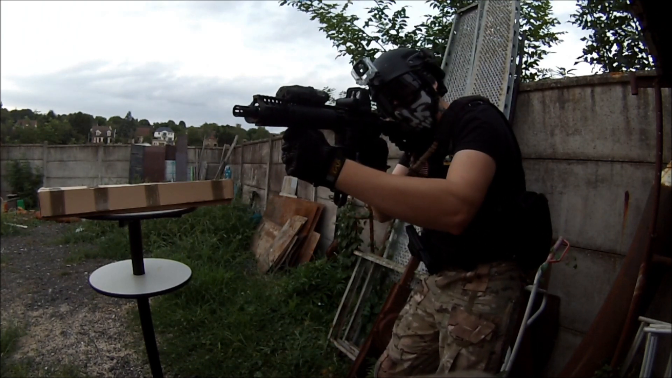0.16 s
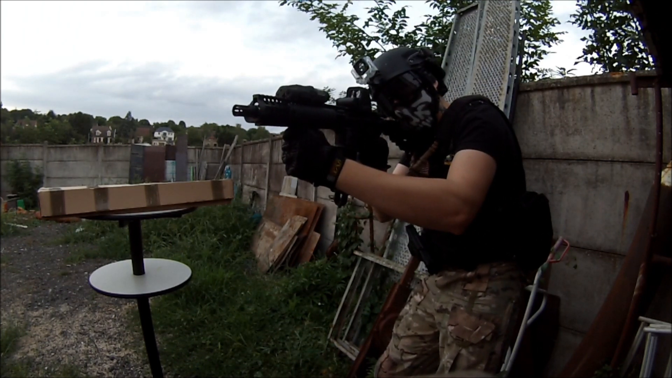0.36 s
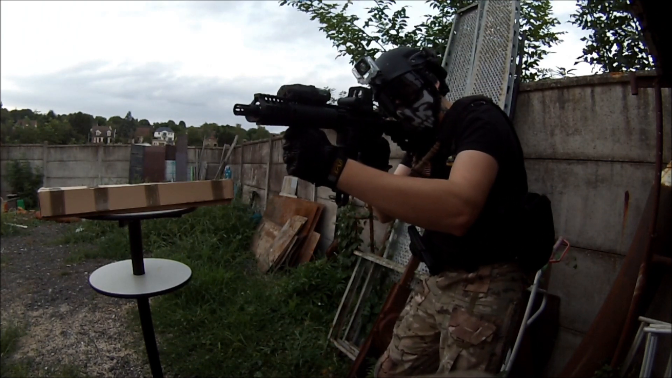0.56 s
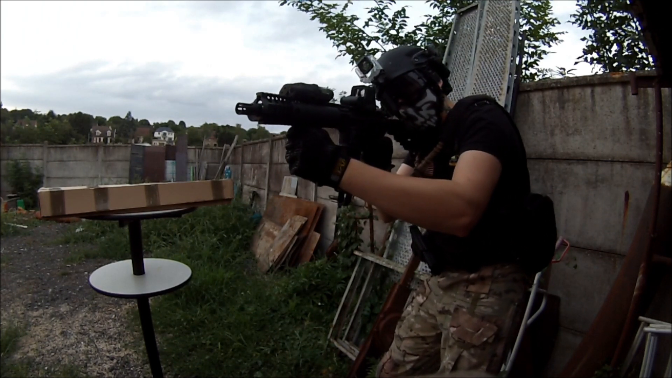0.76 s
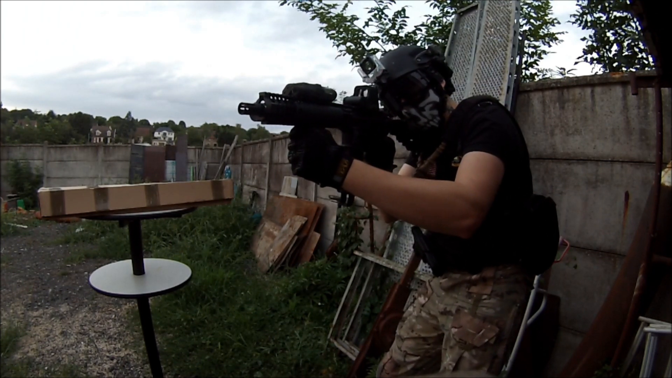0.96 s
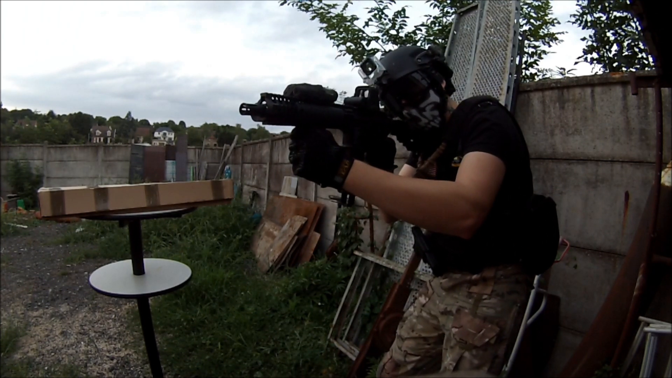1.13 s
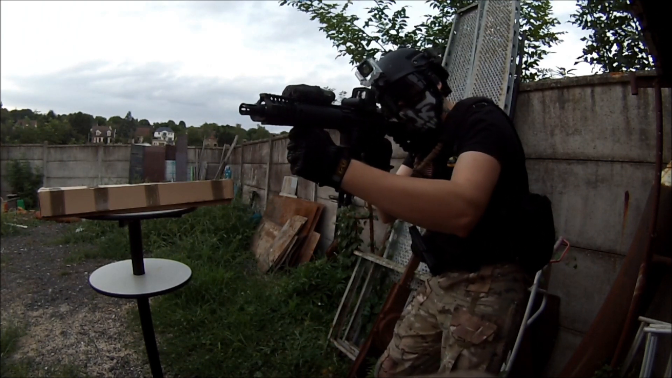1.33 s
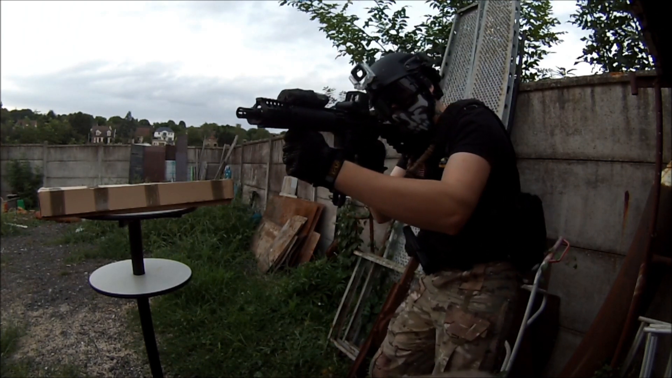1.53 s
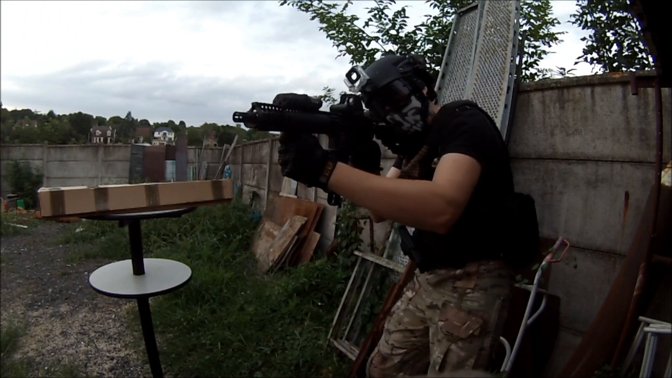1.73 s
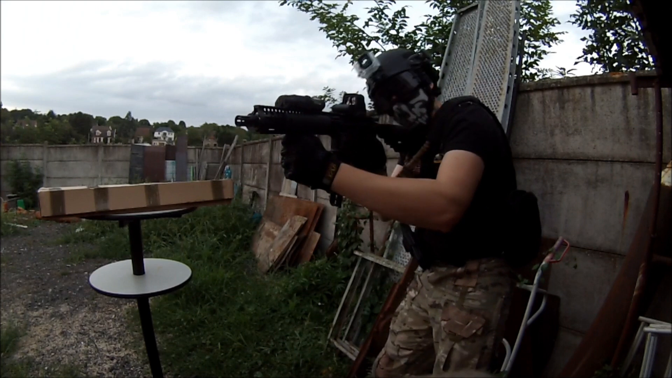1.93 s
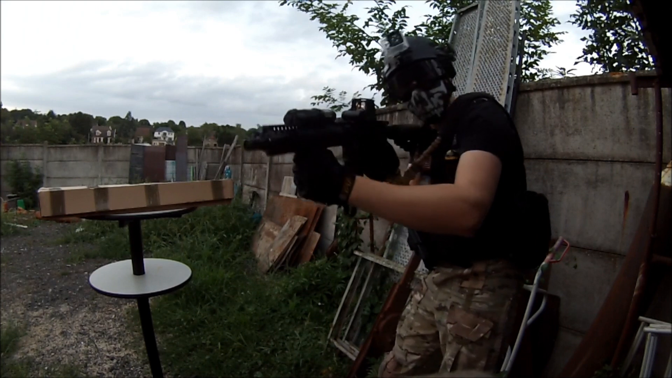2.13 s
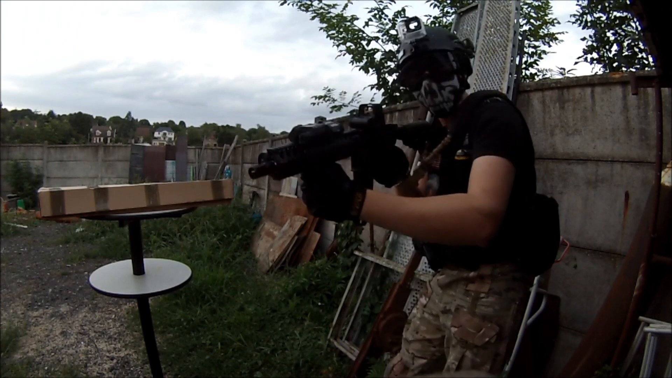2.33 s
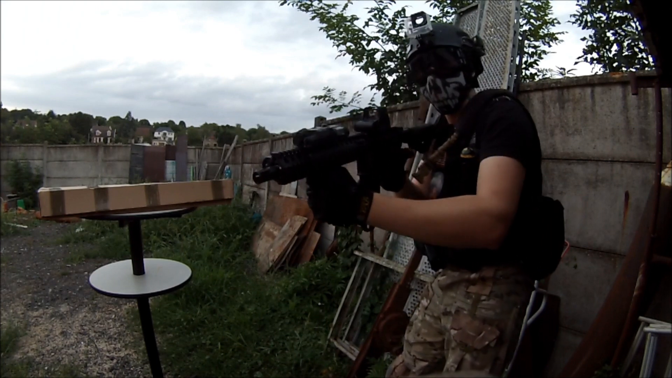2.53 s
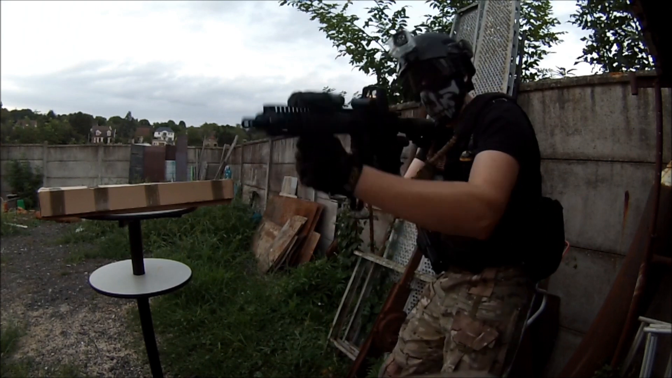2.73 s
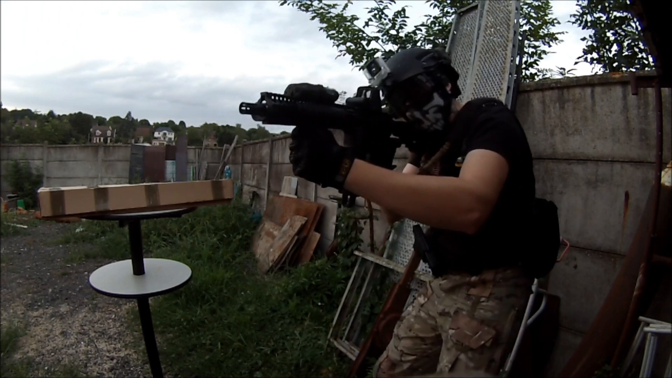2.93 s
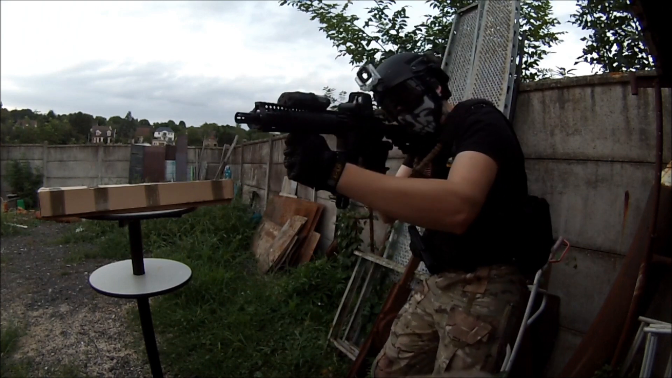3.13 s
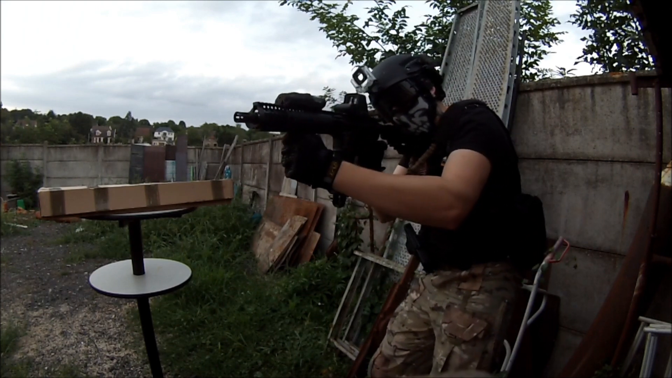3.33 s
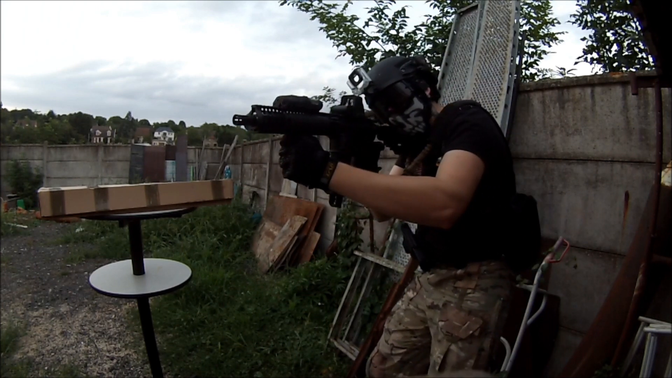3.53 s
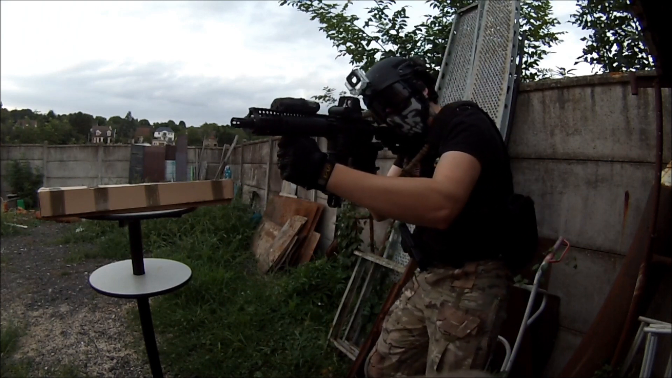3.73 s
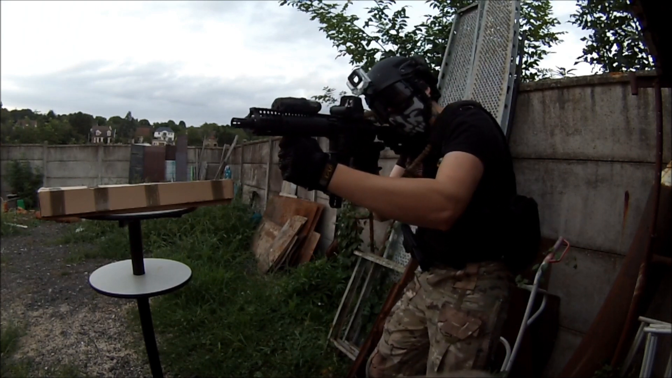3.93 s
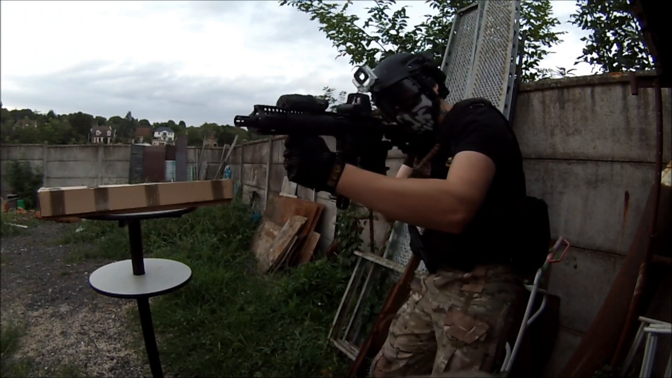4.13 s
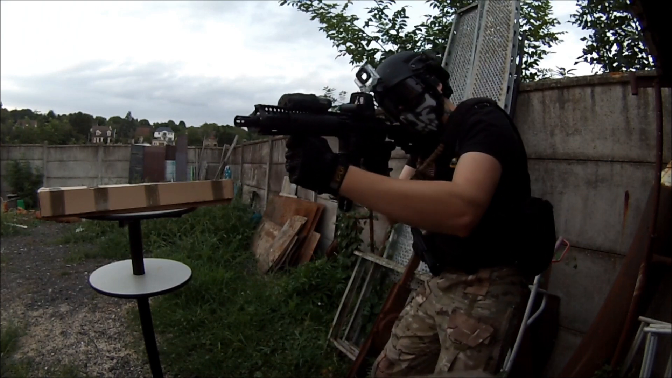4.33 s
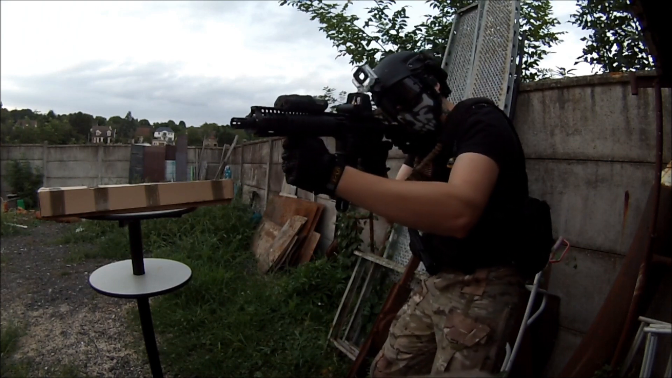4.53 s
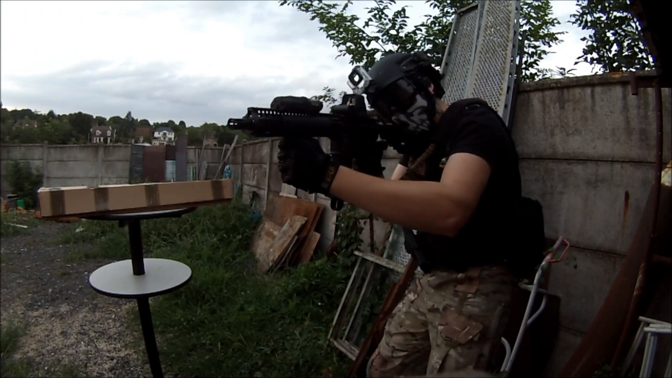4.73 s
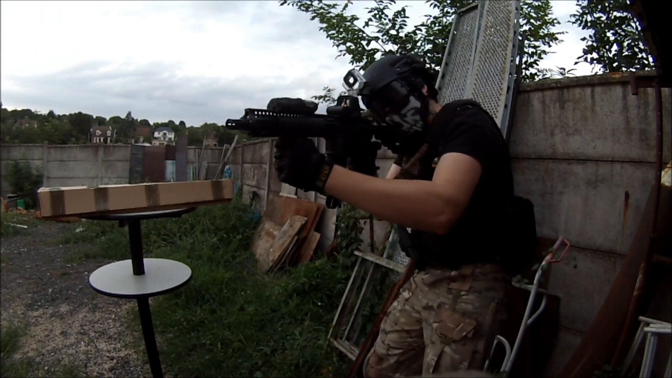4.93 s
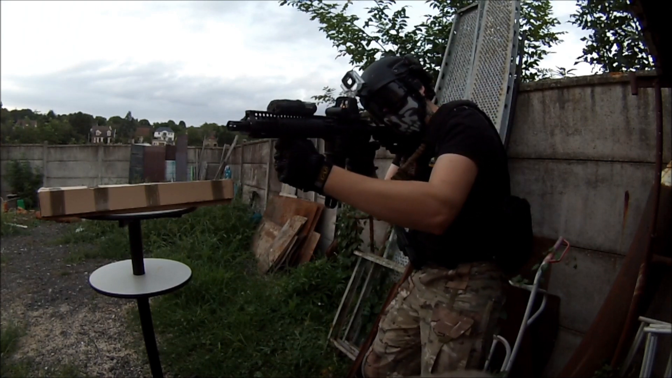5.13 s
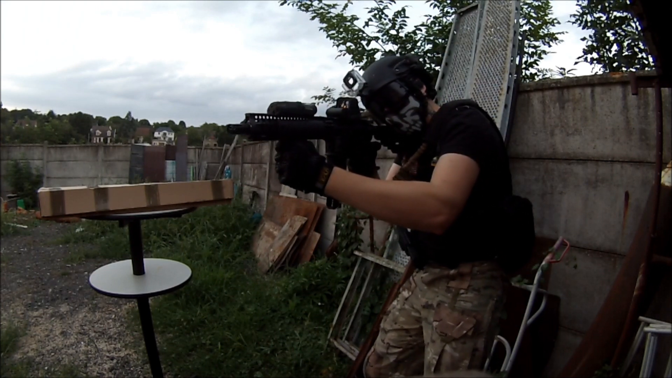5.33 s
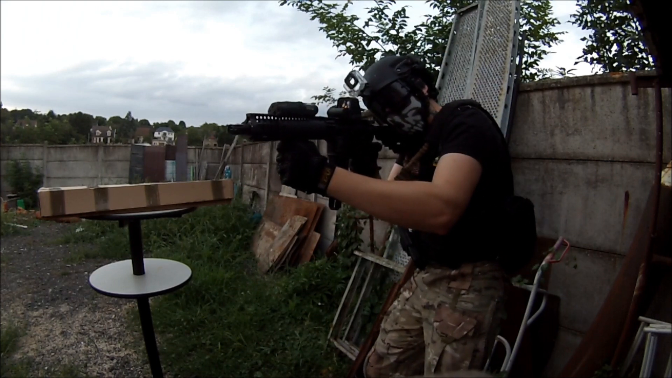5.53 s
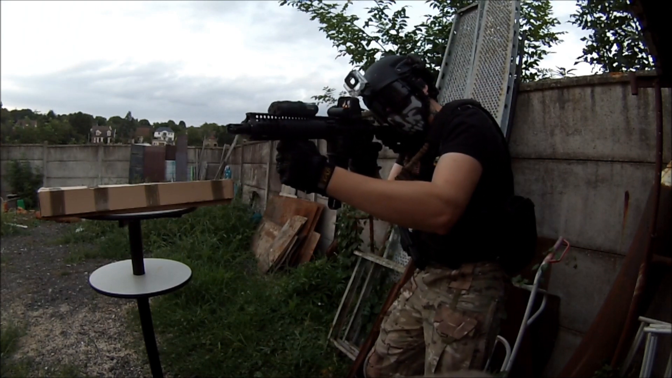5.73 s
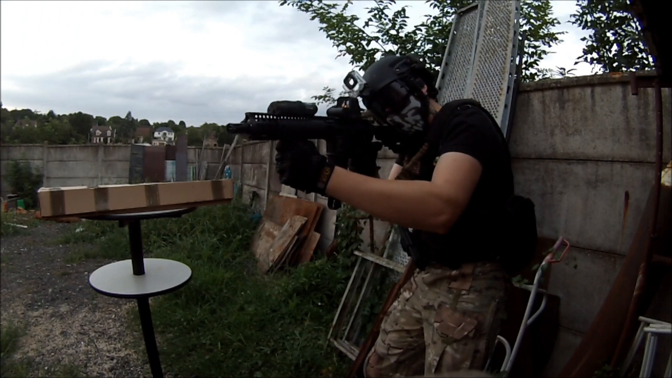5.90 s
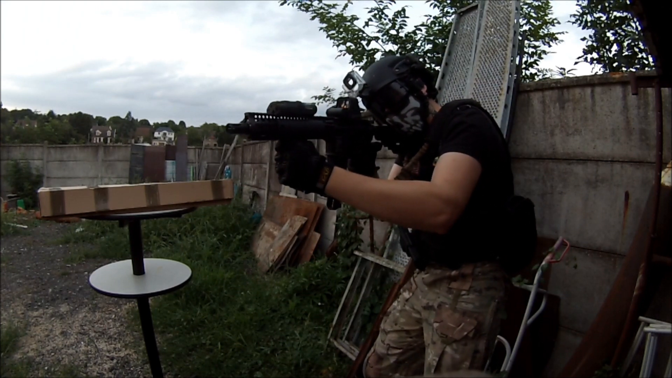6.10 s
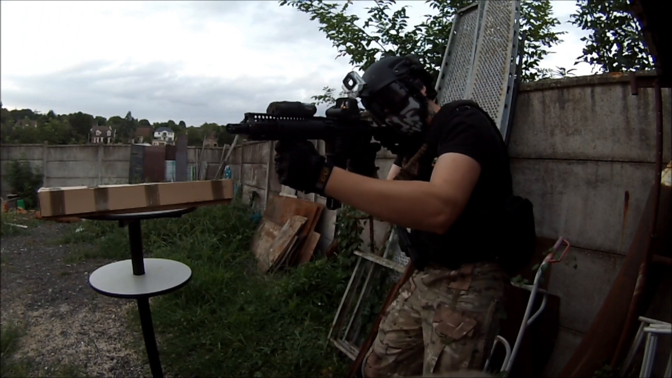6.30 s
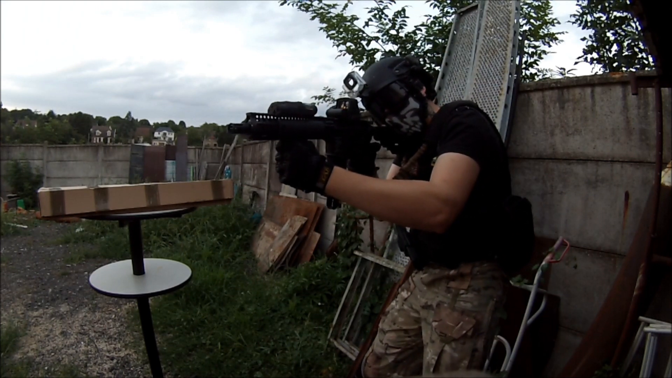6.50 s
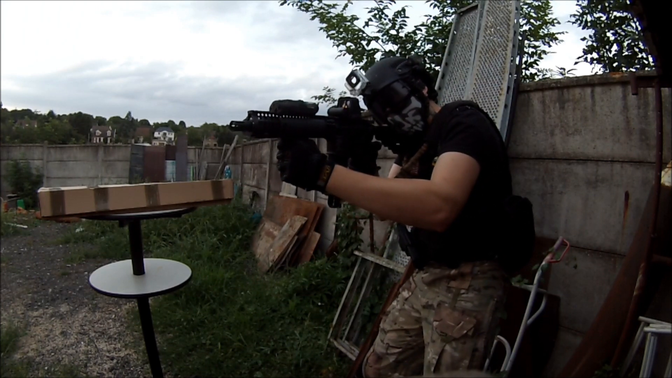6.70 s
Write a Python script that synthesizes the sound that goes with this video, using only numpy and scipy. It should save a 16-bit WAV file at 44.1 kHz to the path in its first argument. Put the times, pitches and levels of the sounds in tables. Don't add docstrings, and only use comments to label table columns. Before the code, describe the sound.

Fading echo of earlier shots, then rapid airsoft bursts of three, four, four and six shots, harsh and slightly overloaded, a few steps from the microphone in a fenced yard. Dry pellet knocks trail the shots. The rifle is handled quietly with buckle clicks and small tings. Afterwards, single shots come about six per second, each with audible gear whine, a hard clack and airy snap, over faint distant traffic.

```python
import sys
import numpy as np
from scipy import signal
from scipy.fft import rfft, irfft, next_fast_len
from scipy.io import wavfile
from scipy.ndimage import uniform_filter1d

SR = 44100
rng = np.random.default_rng(int(sys.argv[2]) if len(sys.argv) > 2 else 0)


def wrap_up_sound(samples):
    columns = np.atleast_2d(samples).T
    tamed = np.clip(columns, -1, 1)
    steps = np.round(tamed * 32767).astype(np.int16)
    wavfile.write(sys.argv[1], SR, steps)


def gain_from_db(level_db):
    decades = np.asarray(level_db, float) / 20
    return 10 ** decades


N = 302481

REGRIP_S = 2.6
# [t/s from the slam, level/dB, T60/s]
REST_CLACKS = [
    (-.072, -21, 0.01),
    (-.0405, -14, 0.075),
]
BURST_CLACKS = [
    (-.056, -27.5, 0.04),
    (-.036, -21, 0.05),
]
SINGLE_CLACKS = [
    (-.086, -41, 0.03),
    (-.065, -22.5, 0.018),
    (-.039, -10.5, .05),
]
# [t/s, level/dB, T60/s]
TRIGGER_SLACK = [
    (0.451, -31.5, 0.032),
    (3.162, -47, .01),
    (3.170, -35, .08),
]
# [multiple of tooth rate, level/dB]
WHINE_HARMONICS = [(1, -2), (2, -17), (3, -19.5)]
# [f/Hz, level/dB]
RATTLE_COLOUR = [(35, -24.5), (60, -12), (503, -14), (785, -4), (2300, -1.5), (3760, 1.5), (4220, -3),
                 (9350, -12.5), (11500, -15.5), (14900, -21), (16000, -27)]
# [f/Hz, level/dB]
CLACK_COLOUR = [(80, 7), (300, 1), (1500, 8), (3000, 6), (5000, -0.5), (6500, 5), (8000, -9.5),
                (15000, -16)]
# [f/Hz, T60/s, level/dB in bursts, level/dB in single shots]
SHELL_MODES = [(775, .05, -39, -41), (1555, .05, -41, -44), (470, .04, -46, -43)]


def gears():
    t = np.arange(N) / SR
    hz = np.full(N, 3600.)
    whine, rattle, clacks = np.zeros(N), np.zeros(N), np.zeros(N)
    strokes = shots()
    for kind, clack_rows in ("rest", REST_CLACKS), ("single", SINGLE_CLACKS), ("burst", BURST_CLACKS):
        slams, _, gear_db = np.transpose(strokes[kind])[:3]
        for slam, db in zip(slams, gear_db):
            start = slam - MOTOR_PACE[kind][0] - RATTLE_GAIN[kind][0]
            now = slice(int(start * SR), int((slam + .03) * SR))
            hz[now], stroke_whine, stroke_rattle = stroke(kind, t[now] - slam)
            hz[now] *= 1 + .008 * rng.standard_normal()
            whine[now] = np.maximum(whine[now], gain_from_db(db) * stroke_whine)
            rattle[now] = np.maximum(rattle[now], gain_from_db(db) * stroke_rattle)
        for lead_s, db, t60 in clack_rows:
            clacks += fade(blows(slams + lead_s, db + 1.2 * rng.standard_normal(len(slams))), t60)
    clacks += sum(fade(blows([s], db), t60) for s, db, t60 in TRIGGER_SLACK)

    phase = 2 * np.pi * np.cumsum(hz * (1 + .016 * walk(700) * (hz / 3800) ** 1.5)) / SR
    tone = 0
    for k, db in WHINE_HARMONICS:
        size = .7 + .3 * np.sin(phase / 16) + .5 * walk(650)
        tone = tone + gain_from_db(db) * (size * np.sin(k * phase) + .45 * walk(650) * np.cos(k * phase))

    shake = (rattle + clacks) * rng.standard_normal(N)
    hum = 0
    for f, t60, burst_db, single_db in SHELL_MODES:
        hum = hum + gain_from_db(np.where(t < REGRIP_S, burst_db, single_db)) * ring(shake, f, t60)
    drone = np.sin(2 * np.pi * np.cumsum(778 + 6 * walk(60)) / SR)
    drone_db = np.where(t < REGRIP_S, -26, -11.5) + 1.5 * walk(120)
    hum += gain_from_db(drone_db) * soften(whine, 60) * drone
    rough = rattle * gain_from_db(2.2 * walk(800)) * noise(RATTLE_COLOUR)
    struck = clacks * gain_from_db(2.5 * walk(900)) * noise(CLACK_COLOUR)
    return whine * tone, hum + rough + struck


MOTOR_PACE = {"rest": (.072, 2500, 1500, .014, 6200), "burst": (.057, 5400, 500, .01, 40500),
              "single": (.0655, 3610, 800, .021, 12500)}
WHINE_GAIN = {"rest": (.008, -20, -16.5, -4), "burst": (.012, -28.5, -25.5, 1.5),
              "single": (.001, -15, -15.5, -2)}
RATTLE_GAIN = {"rest": (.003, -45, -26, -30.5, .09), "burst": (.018, -34.5, -29, -30.5, .2),
               "single": (.021, -35, -22, -24.5, .05)}


def stroke(kind, t):
    let_go_s = .003
    pick_up, start_hz, gain_hz, tau, sag = MOTOR_PACE[kind]
    attack, whine_db, whine_end_db, dip_db = WHINE_GAIN[kind]
    free, free_db, rattle_db, rattle_end_db, t60 = RATTLE_GAIN[kind]
    wound = np.clip(t + pick_up, 0, pick_up - let_go_s)
    share = wound / (pick_up - let_go_s)
    after = np.maximum(t + let_go_s, 0)
    hz = start_hz + gain_hz * (1 - np.exp(-wound / tau)) - sag * wound
    dip = dip_db * np.exp(-((t + .027) / .012) ** 2)
    bite = 7 * np.exp(-wound / .003)
    whine_level = whine_db + (whine_end_db - whine_db) * share + dip + bite - 60 * after / .03
    whine = np.minimum(wound / attack, 1) * gain_from_db(whine_level)
    loaded_db = rattle_db + (rattle_end_db - rattle_db) * share + dip
    rattle = gain_from_db(np.where(wound > 0, loaded_db, free_db) - 60 * np.maximum(t, 0) / t60)
    return hz, whine, rattle * np.clip((t + pick_up + free) / .004, 0, 1)


# [first slam t/s, cycle t/s, gear level/dB of the first stroke]
BURST_STARTS = [
    (.1307, .0801, 4.5),
    (.5326, .0798, 3.5),
    (1.0037, .0805, 4.2),
    (1.413, .0801, 3.5),
    (3.2526, .08, 3.8),
]
BURST_KNOCKS = [
    (7, 0, 2),
    (3, -7, 2, 2),
    (0, -12, 2, -20),
    (-20, -20, -20, -4, 2, -1),
    (0,),
]
# [slam t/s, gear level/dB, knock level/dB]
SINGLE_SHOTS = [(3.5017, -.5, -3), (3.8188, -.5, -12), (3.985, .1, -3), (4.145, -.4, -3), (4.3243, 1, -6),
                (4.503, 0, -1), (4.6728, -.4, 6), (5.0615, .6, 0), (5.2213, .4, 0), (5.3841, 0, -2),
                (5.5503, -.3, -5), (5.7471, .3, -10), (5.9261, .2, -2), (6.091, -.5, -2), (6.2661, -.1, 0),
                (6.4089, -.7, 0), (6.616, .3, -3), (6.831, .1, -3)]
SLAM_LEVEL = {"rest": 1.2, "burst": -1.2, "single": .8}


def shots():
    burst_flight_s, single_flight_s = .2081, .2058
    kinds = {"rest": [], "burst": [], "single": []}
    for s, gear_db, db in SINGLE_SHOTS:
        kinds["single"].append((s, SLAM_LEVEL["single"], gear_db, s + single_flight_s, db))
    for (first, cycle, gear_db), hits in zip(BURST_STARTS, BURST_KNOCKS):
        kinds["rest"].append((first, SLAM_LEVEL["rest"], gear_db, first + burst_flight_s, hits[0]))
        for k, db in enumerate(hits[1:]):
            s = first + .0007 + (k + 1) * cycle
            kinds["burst"].append((s, SLAM_LEVEL["burst"], 0, s + burst_flight_s, db))
    return kinds


# [f/Hz, level/dB, T60/s]
MUZZLE_MODES = [(165.4, -14.5, .03), (257, -34, 0.1), (370, -27, 0.02), (478, -8, 0.014),
                (614, -6.5, 0.016), (754, -16, 0.035), (1286, -21.5, .02), (1551, -10, 0.035),
                (2600, -11, 0.03)]
# [f/Hz, level/dB, T60/s]
RECEIVER_MODES = [(1320, -15, .012), (2030, -2, .006), (2000, -18, .02), (3100, -24, .02),
                  (4140, -16, .007), (5250, -19, .008), (6600, -19, .008)]
# [f/Hz, level/dB]
JET_COLOUR = [(300, -36), (1000, 4.5), (3000, 3.5), (6000, 2), (10000, -8), (15000, -11)]


def piston():
    s, db = np.transpose(sum(shots().values(), []))[:2]
    suck, pop, slam = (MUZZLE_MODES, -.0026, -10), (MUZZLE_MODES, -.0017, 0), (RECEIVER_MODES, -.0001, 0)
    out = 0
    for modes, lead_s, blow_db in (suck, pop, slam):
        for hz, mode_db, t60 in modes:
            level = db + blow_db + mode_db + .8 * rng.standard_normal(len(s))
            out = out - ring(blows(s + lead_s, level), hz, t60)
    shiver = (fade(blows([0], -18), .06) * soften(noise(ECHO_COLOUR), 3500))[:SR // 10]
    jet = fade(blows(s - .005, db - 20), .03)
    jet += fade(blows(s + .0023, db - 31), .18)
    jet += fade(blows(s - .0005, db - 8), .014)
    return out + signal.fftconvolve(blows(s, db), shiver)[:N] + jet * noise(JET_COLOUR)


EXTRA_KNOCK_S, EXTRA_KNOCK_DB = .3895, 1
# [f/Hz, level/dB, T60/s]
BOARD_MODES = [(500, -20, .015), (800, -17, .025), (1000, 0, .005), (1700, -20, .012)]
# [f/Hz, level/dB]
SNAP_COLOUR = [(300, -16), (1000, 2), (2500, 3), (4000, 0), (6500, -8), (12000, -16)]
# [delay t/s, level/dB, treble limit f/Hz]
BOARD_PATHS = [(0, 0, 6000), (.0035, -4, 5000), (.044, -21, 1500), (.0495, -12, 5000), (.0525, -16, 2500),
               (.062, -17, 4000)]


def pellets():
    rows = sum(shots().values(), [(0, 0, 0, EXTRA_KNOCK_S, EXTRA_KNOCK_DB)])
    s, db = np.transpose([row[3:] for row in rows if row[3] < N / SR])
    hit = blows(s - .0003, db - 17)
    snap = blows(s - .0003, db + np.where(s < REGRIP_S, -20, -33))
    knock = sum(gain_from_db(mode_db) * ring(hit, hz, t60) for hz, mode_db, t60 in BOARD_MODES)
    knock = knock + fade(snap, .007) * noise(SNAP_COLOUR)
    box = ring(soften(blows(s + .011, db - 17 - 7), 900), 540, .016)
    dull = noise([(200, -16), (600, -1), (1100, 0), (2800, -5), (5000, -19), (12000, -42)])
    scatter = gain_from_db(-25) * fade(hit, .3) * gain_from_db(3 * walk(300)) * dull
    paths = 0
    for lag, path_db, hz in BOARD_PATHS:
        paths = paths + gain_from_db(path_db) * soften(np.roll(knock, int(lag * SR)), hz)
    return box + scatter + paths


# [t/s, peak level/dB, ring f/Hz, T60/s]
KIT_CLICKS = [
    (2.0215, -36, 1800, .03),
    (2.3822, -28, 3500, 0.029),
    (2.5104, -36, 3520, 0.02),
    (2.5344, -50, 4270, 0.018),
    (2.7194, -51, 3090, 0.02),
    (2.9871, -45, 3810, 0.02),
    (3.025, -46, 1850, 0.02),
]
# [t/s, f/Hz, level/dB, T60/s]
METAL_TINGS = [
    (1.973, 5950, -55, 0.4),
    (1.973, 11090, -52, 0.15),
    (2.2, 2950, -64, .8),
    (2.512, 4270, -61, .4),
]
# [t/s, peak level/dB, attack t/s, T60/s]
SLING_SHIVERS = [
    (2.163, -50, .004, .4),
    (2.208, -51, .012, .7),
    (2.51, -54, .02, .5),
]
# [f/Hz, level/dB]
SLING_MODES = [(2955, -4), (3500, -4), (3984, -2), (4258, 0), (4650, -2), (5033, -1), (5700, -2),
               (6277, -2), (6912, -1), (7709, -1), (8470, -3), (9292, -4), (10140, -5), (11040, -5),
               (11960, -7), (12900, -9)]


def kit():
    out = sum(ring(blows([s], db), hz, t60) for s, hz, db, t60 in METAL_TINGS)
    crisp = noise([(1500, -21), (3500, 5), (8000, -1.5), (14000, -19)])
    for s, db, hz, t60 in KIT_CLICKS:
        tick = blows([s], db)
        out = out + .49 * ring(tick, hz, t60) + .17 * ring(tick, 5.7 * hz, t60 / 2)
        out = out + .25 * fade(tick, t60) * crisp
    shiver = 0
    for s, db, attack, t60 in SLING_SHIVERS:
        shiver = shiver + peak(np.arange(N) / SR - s, db, 40 / attack, 60 / t60)
    grains = rng.standard_normal(N) * (rng.random(N) < .02)
    metal = sum(gain_from_db(db + 3 * walk(20)) * ring(grains, hz, .07) for hz, db in SLING_MODES)
    return out + shiver * (.65 * unit(metal) + .65 * crisp)


# [delay t/s, level/dB]
NEAR_ECHOES = [(.0045, -15), (.0125, -27)]
# [f/Hz, level/dB]
ECHO_COLOUR = [(60, -19.5), (300, -9.5), (1000, -6), (2000, -7), (2800, -1.5), (5000, -8.5), (9000, -13),
               (15000, -19)]


def yard(dry, far):
    lag = np.arange(int(.35 * SR)) / SR
    houses = peak(lag - .083, -55.5, 350, 60 / .33)
    fence = peak(lag, -48, 0, 60 / .09)
    scatter = noise(ECHO_COLOUR)[:len(lag)]
    hush = gain_from_db(-77 - 30 * lag) * soften(scatter, 2500)
    tail = (fence + houses) * scatter + hush
    near = sum(gain_from_db(wall_db) * np.roll(dry, int(delay * SR)) for delay, wall_db in NEAR_ECHOES)
    return dry + near + signal.fftconvolve(far, tail)[:N]


# [f/Hz, level/dB]
AIR_COLOUR = [(12, -46.5), (20, 5.5), (55, -2.5), (399, -17), (472, -10), (574, -21.5), (624, -17),
              (1530, -23.5), (3340, -30), (3840, -31.5), (12100, -47), (16000, -62.5)]
# [f/Hz, level/dB]
MACHINE_HUM = [(52, -63), (620, -71)]
# [t/s, level/dB]
EARLIER_ECHOES = [
    (0, -36),
    (.06, -39.5),
    (.2, -65.5),
]


def air():
    t = np.arange(N) / SR
    tyres = noise([(900, -27), (1550, 2), (1750, -13), (2600, -31)])
    car = peak(t - 2.87, -61, 52, 78) * tyres
    hum = sum(gain_from_db(db + 3 * walk(8.7)) * np.sin(2 * np.pi * hz * t) for hz, db in MACHINE_HUM)
    breeze = gain_from_db(-51 + .8 * walk(6)) * noise(AIR_COLOUR)
    return breeze + hum + car + curve(EARLIER_ECHOES) * noise(ECHO_COLOUR)


def unit(x):
    return x / np.sqrt(np.mean(x ** 2))


def colour(x, spectrum):
    hz, db = np.transpose(spectrum)
    f = np.log(np.arange(len(x) // 2 + 1) * SR / len(x) + 1)
    return irfft(rfft(x) * gain_from_db(np.interp(f, np.log(hz), db)), len(x))


def noise(spectrum):
    return unit(colour(rng.standard_normal(next_fast_len(N)), spectrum)[:N])


def curve(rows):
    s, db = np.transpose(rows)
    return gain_from_db(np.interp(np.arange(N) / SR, s, db, left=-120, right=-120))


def peak(t, db, rise_db_s, fall_db_s):
    return gain_from_db(db + np.where(t < 0, rise_db_s * t, -fall_db_s * t))


def blows(s, db):
    at = np.clip((np.asarray(s) * SR).astype(int), 0, N - 1)
    return np.bincount(at, gain_from_db(np.asarray(db) + 0 * np.asarray(s)), N)


def fade(x, t60):
    return signal.lfilter([1], [1, -np.exp(-np.log(1000) / (t60 * SR))], x)


def ring(x, hz, t60):
    p = np.exp(2j * np.pi * hz / SR - np.log(1000) / (t60 * SR))
    return signal.lfilter([0, p.imag], [1, -2 * p.real, abs(p) ** 2], x)


def soften(x, hz):
    return signal.lfilter(*signal.butter(2, min(hz, 20000), fs=SR), x)


def walk(rate):
    k = int(SR / rate)
    held = np.repeat(rng.standard_normal(N // k + 1), k)
    return unit(uniform_filter1d(uniform_filter1d(held, k), k)[:N])


def scene():
    whine, rattle = gears()
    knocks = rattle + piston()
    rifle = yard(knocks + whine, knocks + .18 * whine)
    no_bass = signal.butter(3, 104, "high", fs=SR, output="sos")
    return (signal.sosfilt(no_bass, rifle + pellets()) + kit() + air())[None]


def band_limit(x):
    return signal.sosfilt(signal.butter(12, 16410, fs=SR, output="sos"), x)


def record(dry):
    heard = signal.sosfilt(signal.ellip(6, .3, 40, 15400, fs=SR, output="sos"), dry)
    mix = np.clip(1.068 * heard, -.97, .97)
    return band_limit(mix)


dry = scene()
out = record(dry)
wrap_up_sound(out)
```